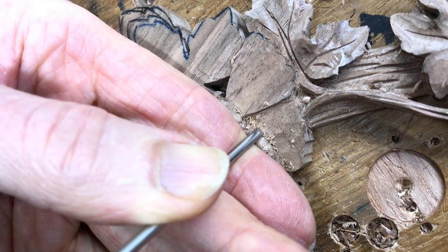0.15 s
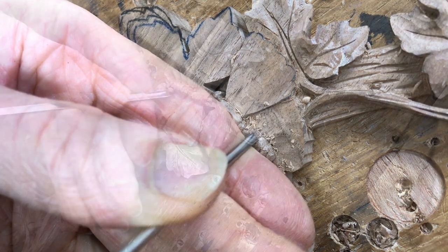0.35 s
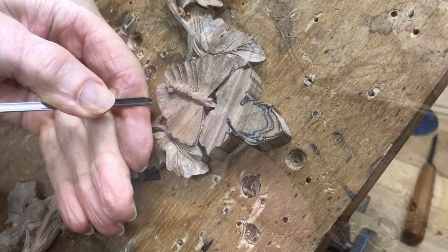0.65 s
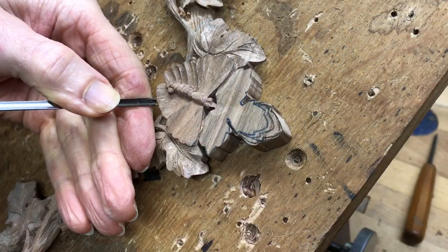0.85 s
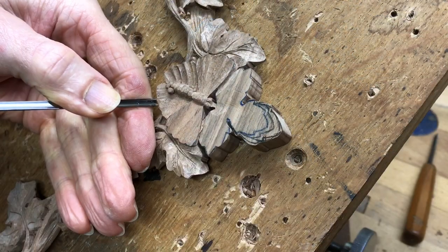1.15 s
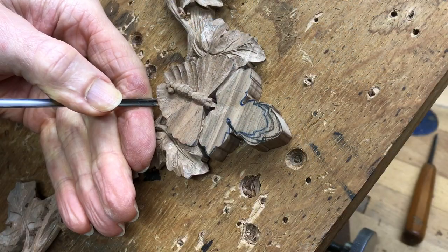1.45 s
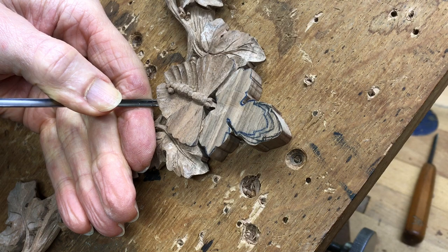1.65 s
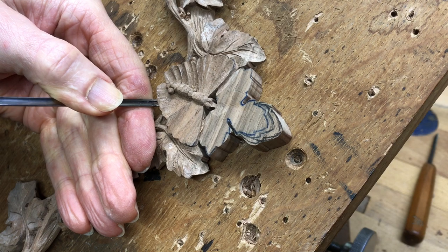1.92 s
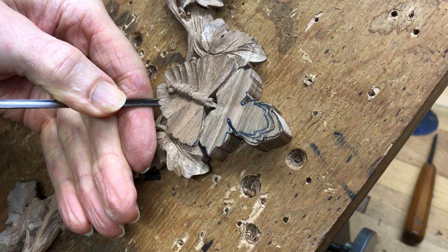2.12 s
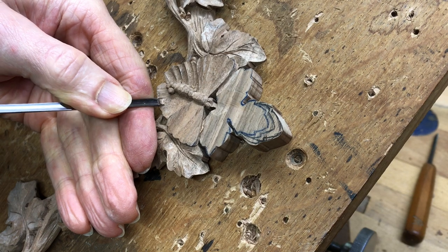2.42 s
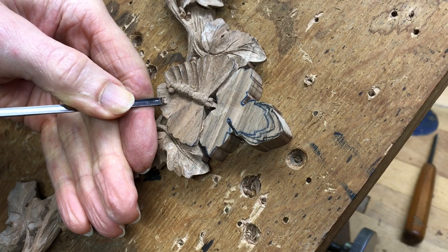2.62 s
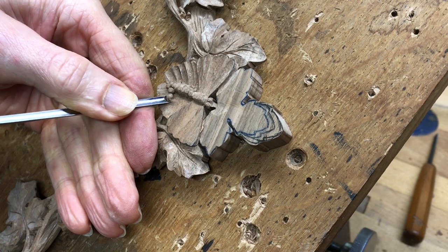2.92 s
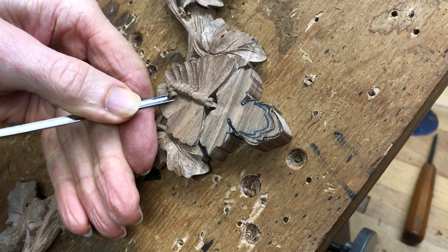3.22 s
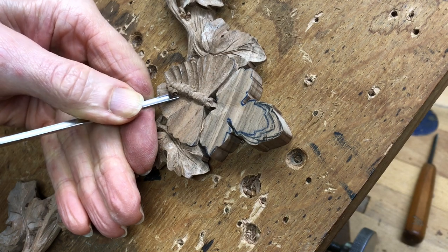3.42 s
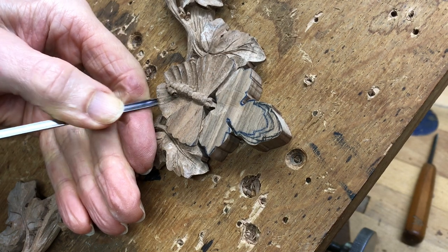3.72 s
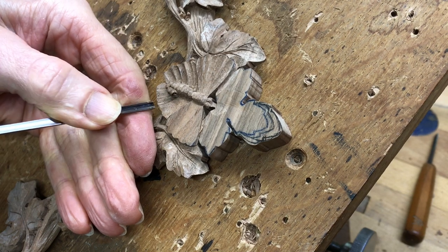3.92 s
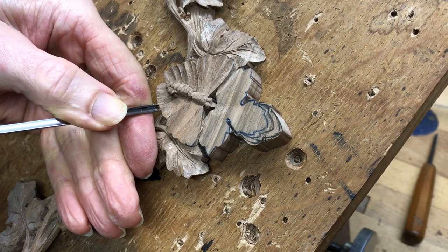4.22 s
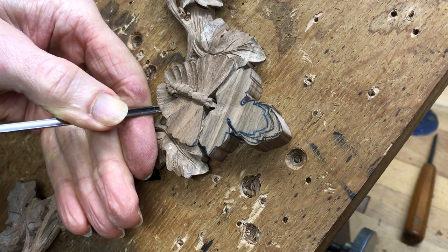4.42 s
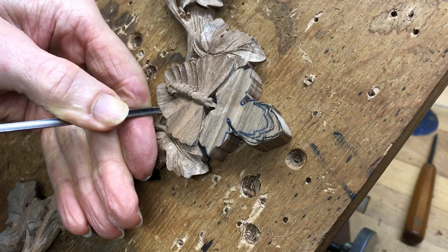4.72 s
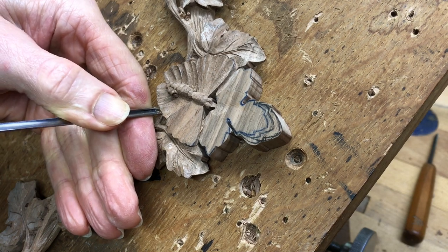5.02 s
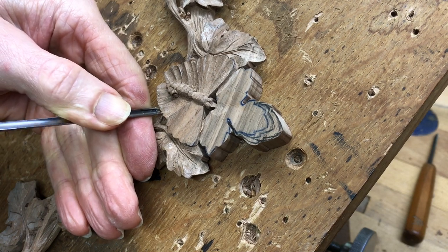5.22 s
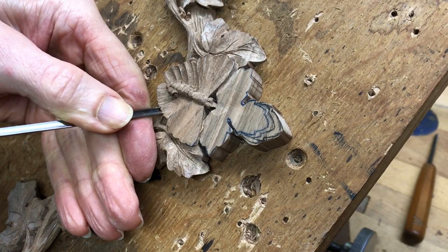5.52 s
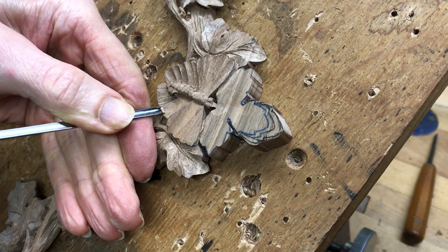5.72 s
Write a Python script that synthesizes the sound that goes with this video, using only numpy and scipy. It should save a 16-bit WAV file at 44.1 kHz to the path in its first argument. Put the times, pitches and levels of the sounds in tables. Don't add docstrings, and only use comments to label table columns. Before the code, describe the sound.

Close phone microphone in a small workshop, mono, slight hiss. A short crackling cut starts at once, then a pause. Irregular crisp snaps with a bright steely ring and low bench thumps follow, loudest near 3.3 seconds. Quiet hum returns, then a rattle of hollow wooden taps and three quick nips at the end.

```python
import sys
import numpy as np
from scipy import signal
from scipy.io import wavfile
from scipy.ndimage import uniform_filter1d

SR = 44100
rng = np.random.default_rng(int(sys.argv[2]) if len(sys.argv) > 2 else 0)


def persist_wave(psi):
    counts = np.round(np.clip(psi, -1, 1) * 32767).astype(np.int16)
    wavfile.write(sys.argv[1], SR, np.atleast_2d(counts).T)


def gain_from_decibels(decibels):
    exponent = np.asarray(decibels, float) / 20
    return 10 ** exponent


N = 258426

# f/Hz, width/Hz, level/dB
BLADE_MODES = [(1580, 100, 11.5), (1970, 130, 2), (2530, 170, 6), (2720, 160, -13), (2945, 340, 7),
               (2970, 110, 7), (3780, 240, 5), (4200, 160, -7), (4350, 240, -47), (5120, 470, 5.5),
               (5300, 210, -7), (5970, 330, 4.5), (7110, 140, -9), (7000, 220, -1), (7700, 430, -14)]
# f/Hz, width/Hz, level/dB
CARVING_MODES = [(428, 38, 5.5), (559, 60, 4.5), (731, 70, 6), (1085, 40, 1.5), (1600, 61, 1.5),
                 (1628, 150, -17.5), (1944, 19, -4), (2300, 70, -3)]
# f/Hz, width/Hz, level/dB
BENCH_MODES = [(65.3, 7.3, -7), (129.1, 8.5, 2.5), (175.5, 12, -10), (205.1, 12.8, -2), (254, 15, -3),
               (303, 27, -13.5), (229, 76, 4)]


def evened(x):
    return x / np.sqrt(np.mean(x ** 2) + 1e-20)


def read(points, hz):
    f, value = np.transpose(points)
    return np.interp(np.log(hz + 1), np.log(f + 1), value)


def add(mix, s, sound):
    at = round(s * SR)
    sound = sound[..., max(-at, 0):]
    part = mix[..., max(at, 0):][..., :sound.shape[-1]]
    part += sound[..., :part.shape[-1]]


def ring(modes, seconds=.25):
    t = np.arange(round(seconds * SR)) / SR
    h = np.zeros(len(t))
    for k, (hz, width, db) in enumerate(modes):
        decay = np.sqrt(width) * np.exp(-np.pi * width * t)
        h += (-1) ** k * gain_from_decibels(db) * decay * np.sin(2 * np.pi * hz * t)
    return h / np.linalg.norm(h)


def causal(points, size=1024):
    log_gain = read(points, abs(np.fft.fftfreq(size, 1 / SR))) * np.log(10) / 20
    h = np.fft.ifft(np.exp(np.conj(signal.hilbert(log_gain)))).real[:size // 2]
    return h / np.linalg.norm(h)


def bump(t, centre, width):
    return np.exp(-((t - centre) / width) ** 4)


def hum():
    # f/Hz, level/dB per Hz
    air = [(25, -30), (44, -11.5), (90, 3.5), (156, -1.5), (360, -17), (500, -22.5), (690, -22.5),
           (900, -26), (2000, -29.5), (5600, -31), (10000, -36.5), (13000, -37), (15700, -37.5),
           (16050, -100)]
    # t/s (centre), half length/s, level/dB
    stirs = [
        (0., 0.1, 5),
        (.45, .12, 5),
        (1.3, .3, 2.5),
        (2.2, .3, 3),
        (3.72, .25, 5.5),
        (5.347, 0.18, 9),
    ]
    frames, hz = N // 256 + 5, np.fft.rfftfreq(1024, 1 / SR)
    t = (np.arange(frames) - 2) * 256 / SR
    a, b, patches = rng.standard_normal((frames, 513, 3)).T
    patches = evened(uniform_filter1d(uniform_filter1d(patches, 12, 0), 14, 1))
    patches /= (1 + hz / 4000)[:, None]
    murmur = np.exp(-np.log((hz + 1) / 380) ** 2 / 0.22)
    stir_db = np.outer(murmur, sum(db * bump(t, s, width) for s, width, db in stirs))
    dip_db = -3.5 * bump(t, 0.54, 0.16)
    z = (a + 1j * b) * gain_from_decibels(read(air, hz)[:, None] + 1.8 * patches + stir_db + dip_db)
    return gain_from_decibels(-48.5) * evened(signal.istft(z, nperseg=1024, noverlap=768)[1][:N])


def pare(s, db, carving_db, t60, fizz_db):
    rise_s, drag_bench_db = 0.0068, -3.5
    return s, db, carving_db, fizz_db, t60, rise_s, carving_db + drag_bench_db


def nip(s, db, bench_db, fizz_db):
    harder_db, rise_s = db + 22, .0023
    carving_db = -7 - 0.33 * harder_db
    t60 = .04 - .0012 * harder_db
    return s, db, carving_db, fizz_db, t60, rise_s, bench_db


def gripped(drive, modes, grip_db):
    knots = np.arange(0, N / SR + .1, .06)
    sway_db = grip_db * rng.standard_normal((len(knots), len(modes))).T
    weight = gain_from_decibels([db for hz, width, db in modes])
    t = np.arange(N) / SR
    out = np.zeros(N)
    for k, mode in enumerate(modes):
        held = drive * gain_from_decibels(np.interp(t, knots, sway_db[k]))
        out += (-1) ** k * weight[k] * signal.oaconvolve(held, ring([mode], 0.027))[:N]
    return out / np.linalg.norm(weight)


def gouge(cuts, blade_modes, snaps_per_s, spread_db, cutoff, gain_db, jolt_db, rumble_db, crack_db):
    # f/Hz, level/dB per Hz
    snap_tone = [(1060, -17), (1800, 11), (3990, 5.5), (5360, -12.5), (5960, -14), (6520, -8), (11000, -33),
                 (14300, -68), (22000, -120)]
    # f/Hz, level/dB per Hz
    fizz_tone = [(4000, -11), (8000, -3), (11000, -7.5), (14000, -5), (16200, -15), (16700, -53)]
    snaps = (rng.random(N) < snaps_per_s / SR) * rng.choice([-1., 1.], N)
    snaps = evened(snaps * gain_from_decibels(spread_db * np.minimum(rng.exponential(1, N), 3.5)))
    snaps /= (uniform_filter1d(snaps ** 2, 200) + 0.076) ** 0.25

    lead_s = .02
    t = np.arange(SR // 4) / SR - lead_s
    force, jolt = np.zeros((4, N)), np.zeros(N)
    linger = np.array([[.95], [1.3], [.55], [1.3]])
    for s, db, carving_db, fizz_db, t60, rise, bench_db in cuts:
        loading = (1 + np.tanh(t / (0.58 * max(rise, 2e-4)))) / 2
        bite = loading * gain_from_decibels(-60 * (np.maximum(t, 0) / (linger * max(t60, .01))) ** cutoff)
        part_db = np.array([[0], [carving_db + 5.5], [fizz_db + 6.0], [bench_db + rumble_db]])
        share = gain_from_decibels(db + gain_db + part_db)
        add(force, s - lead_s, share * bite / bite.max(axis=1, keepdims=True))
        add(jolt, s + 0.0029, -gain_from_decibels(db + bench_db + jolt_db) * signal.windows.hann(60))

    edge, carving, fizz, bench = force * snaps
    out = gripped(edge, blade_modes, grip_db=3.5)
    out += signal.oaconvolve(gain_from_decibels(crack_db) * edge, causal(snap_tone))[:N]
    out += signal.oaconvolve(carving, ring(CARVING_MODES))[:N]
    out += signal.oaconvolve(fizz, causal(fizz_tone))[:N]
    out += signal.oaconvolve(bench + jolt, ring(BENCH_MODES))[:N]
    return out


def shop(x):
    # f/Hz, t60/s
    room_decay = [(100, 0.85), (300, 0.48), (800, 0.22), (2000, 0.11), (8000, 0.18)]
    taps = np.zeros(SR // 2)
    at = np.arange(200, len(taps) - 20, 20)
    taps[at + rng.integers(0, 20, len(at))] = rng.choice([-1., 1.], len(at))
    hz, t, z = signal.stft(taps, SR, nperseg=256)
    tail = signal.istft(z * gain_from_decibels(-60 * t / read(room_decay, hz)[:, None]), SR, nperseg=256)[1]
    return signal.fftconvolve(x, tail / np.linalg.norm(tail))[:N]


def clock():
    # lateness/s, high ring level/dB, f/Hz, low ring level/dB, length/s
    tock = (.009, -63.5, 1930, -54, .025)
    tick = (0, -62.5, 1700, -60, .035)
    # t/s, high ring level/dB, f/Hz, low ring level/dB, length/s
    rubs = [
        (0.253, -57, 1780, -54, .012),
        (0.269, -55, 1760, -52, .014),
        (.402, -56.5, 1770, -67, .028),
        (.447, -70, 1670, -52, .015),
        (3.55, -64, 1640, -74, .025),
        (5.682, -62, 1600, -44, .016),
    ]
    first_beat_s, beat_s, beats = .389, .3639, 15
    rattles = []
    for k in range(beats):
        late, *voice = (tock, tick)[k % 2]
        rattles.append((first_beat_s + k * beat_s + late, *voice))
    out, t = np.zeros(N), np.arange(SR // 8) / SR
    for s, db, hz, low_db, length in rattles + rubs:
        rattle = rng.standard_normal(len(t)) * np.exp(-(t / length) ** 2)
        high_case = ring([(hz, 120, 0), (hz * 0.936, 140, -3), (hz * 1.26, 300, -8)], .03)
        low_case = ring([(700, 23, 0)], 0.026)
        add(out, s, gain_from_decibels(db - 1.5) * np.convolve(rattle, high_case))
        add(out, s, gain_from_decibels(low_db - 8.0) * np.convolve(rattle, low_case))
    return out


def knocks():
    # t/s, hollow knock level/dB, f/Hz, hard tip level/dB
    knock_rows = [(2.044, -39.5, 594, -50), (2.259, -41, 746, -57), (2.307, -41, 623, -41.5),
                  (2.629, -36, 700, -48), (5.216, -43, 450, -73), (5.231, -46, 585, -68),
                  (5.258, -42, 575, -47.5), (5.286, -42, 590, -43), (5.332, -40.5, 646, -57),
                  (5.38, -37, 730, -40.5), (5.436, -39, 670, -56)]
    tip_hz = 2320
    out, blows, ticks = np.zeros(N), np.zeros(N), np.zeros(N)
    t = np.arange(SR // 20) / SR
    for s, db, hz, tip_db in knock_rows:
        hollow = np.sin(2 * np.pi * hz * t) * (1 - np.exp(-t / 0.0012))
        add(out, s, gain_from_decibels(db + 3 - 60 * t / 0.025) * hollow)
        add(out, s, gain_from_decibels(tip_db + 2.5 - 60 * t / 0.012) * np.sin(2 * np.pi * tip_hz * t))
        add(blows, s, gain_from_decibels(db - 1.2) * signal.windows.hann(30))
        add(ticks, s, gain_from_decibels(np.array([tip_db + 8.5])))
    after = ring(CARVING_MODES) + gain_from_decibels(1.5) * ring(BENCH_MODES)
    out += signal.oaconvolve(blows, after)[:N]
    return out + signal.oaconvolve(ticks, ring(BLADE_MODES))[:N]


def scene():
    # t/s, fibre snaps level/dB, carving level over snaps/dB, t60/s
    close_rows = [
        (.0034, -35, -6, .046),
        (.0164, -32.5, -9, .07),
        (0.029, -28, -10, 0.047),
        (0.0378, -29.5, -8, 0.057),
        (.2483, -50, -8, .04),
        (.2754, -47, -6, .037),
    ]
    # t/s, snaps level/dB, carving level/dB, fizz level/dB, t60/s, rise/s, bench level/dB
    close_nip = (.051, -23, -14, -15, .016, -0.02, -2)
    # f/Hz, width/Hz, level/dB
    close_blade = [(1780, 130, 14), (2150, 200, -10), (2510, 90, 8), (3500, 300, -3), (4640, 140, 3),
                   (5640, 170, 3.5), (6470, 170, 1.5), (7000, 250, -8), (8960, 320, -23)]
    # bench/dB, fizz/dB, tear/dB
    nip_rows = [(1.9682, -28, -5, -14, -26), (2.0783, -24, -5, -14, -22), (2.3211, -28, -5.5, -14, -19),
                (2.4931, -24, -6.5, -22, -12), (2.5344, -22, -19, -17, -13), (2.7318, -19, -11, -20, -9),
                (2.818, -19, -6, -19, -14), (2.9864, -17.5, -5.5, -24, -15), (3.1042, -21, -6, -21, -20),
                (3.2035, -24, -10, -22, -8), (3.2822, -13, -17, -17.5, -24), (5.7962, -19, -23, -27, -12),
                (5.8226, -24, -15, -26, -5.5), (5.8504, -25.5, -5, -20, -30)]
    # t/s, fibre snaps level/dB, carving level over snaps/dB, t60/s
    pare_rows = [(1.34, -50, -11, 0.04), (2.0536, -45, 4.5, .086), (2.0738, -30, -4, .048),
                 (2.1744, -35, -2.5, 0.069), (2.186, -35, -17, .045), (2.201, -47, 0, 0.041),
                 (2.395, -45.5, -6, 0.024), (2.484, -41.5, 4, .11), (2.5804, -52, -6, .077),
                 (2.838, -24, -6.5, 0.056), (2.979, -43, 9.5, .035), (3.2334, -59, 12, .065),
                 (3.3135, -31, -7.5, 0.11), (3.34, -40, 1, 0.11), (3.371, -36, -5, .059),
                 (3.3906, -41.5, -22, 0.069), (3.562, -60.5, 10, 0.075), (3.608, -47.5, -10, .044),
                 (3.6364, -51.5, -7, 0.14), (5.3004, -58, 4, 0.059), (5.5522, -32.5, 2, 0.035),
                 (5.5604, -36.5, -15, .042), (5.732, -33, -2, 0.086), (5.775, -34, -0.5, .098)]

    close = [close_nip] + [pare(*row, fizz_db=-14.5) for row in close_rows]
    nips = [nip(*row[:-1]) for row in nip_rows]
    tears = [pare(s + .013, db + tear_db, carving_db=-6, t60=0.049, fizz_db=-24)
             for s, db, _, _, tear_db in nip_rows]
    pares = [pare(*row, fizz_db=-19.5 - 0.23 * (row[1] + 38)) for row in pare_rows]

    work = gouge(close, close_blade, snaps_per_s=5900, spread_db=3.5, cutoff=1.5,
                 gain_db=-12.5, jolt_db=-9.5, rumble_db=-6.0, crack_db=-7.0)
    work += gouge(nips, BLADE_MODES, snaps_per_s=9000, spread_db=6.0, cutoff=1.1,
                  gain_db=-12.5, jolt_db=-2.5, rumble_db=-8.0, crack_db=-1.5)
    work += gouge(tears + pares, BLADE_MODES, snaps_per_s=7000, spread_db=3.5, cutoff=1.5,
                  gain_db=-14.0, jolt_db=-24.0, rumble_db=8.0, crack_db=0.0)
    work += knocks()
    echo = gain_from_decibels(-13.5) * shop(work)
    return (work + echo + clock() + hum())[None]


def top_cut(x):
    return signal.sosfilt(signal.butter(12, 16650, fs=SR, output="sos"), x)


def record(dry):
    low_cut = signal.butter(6, 47, "high", fs=SR, output="sos")
    mix = signal.sosfilt(low_cut, dry)
    return top_cut(mix)


dry = scene()
out = record(dry)
persist_wave(out)
```